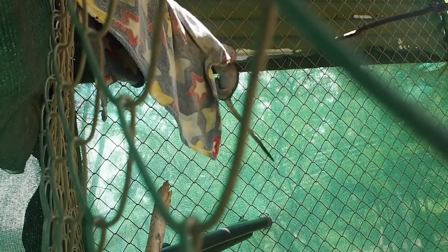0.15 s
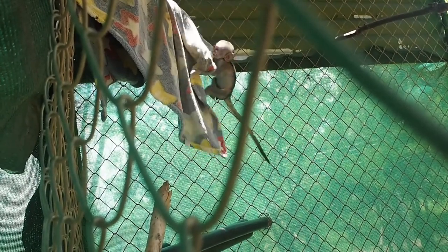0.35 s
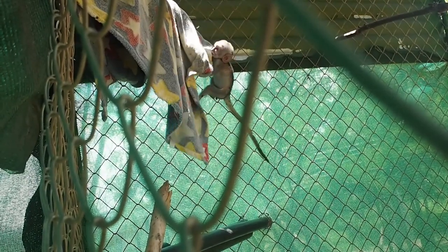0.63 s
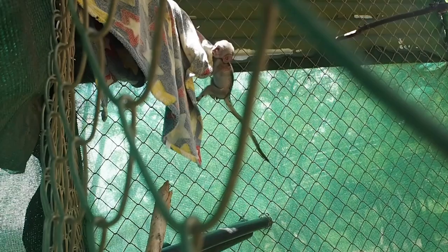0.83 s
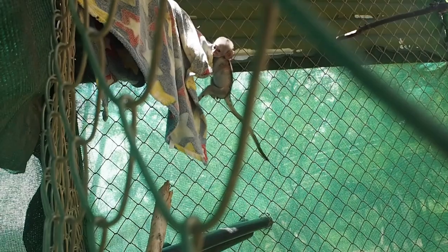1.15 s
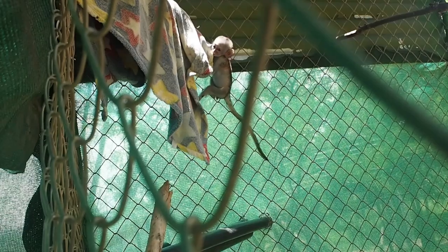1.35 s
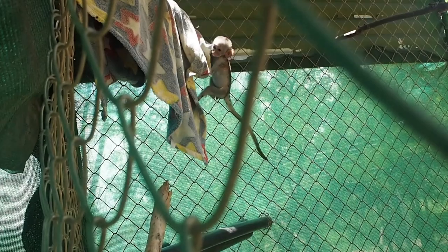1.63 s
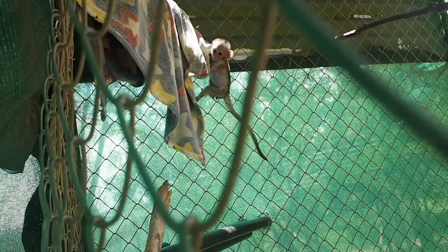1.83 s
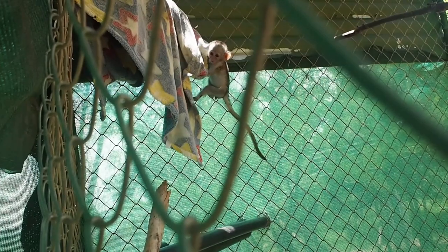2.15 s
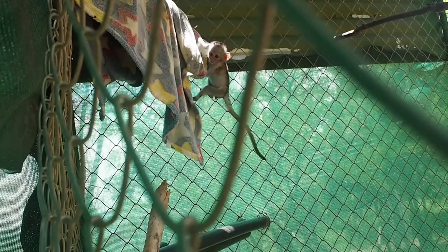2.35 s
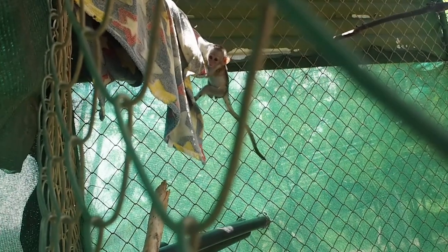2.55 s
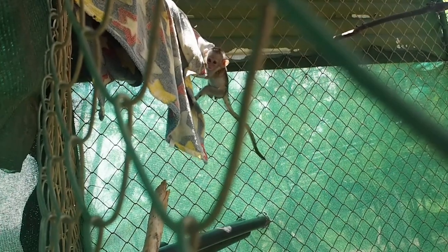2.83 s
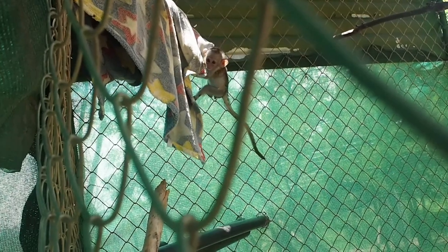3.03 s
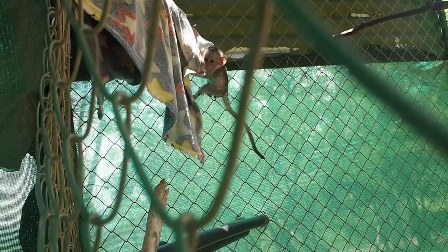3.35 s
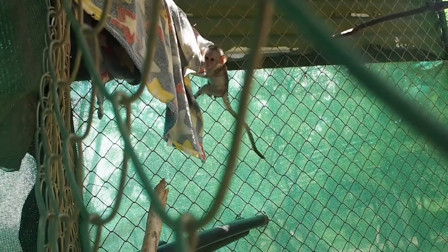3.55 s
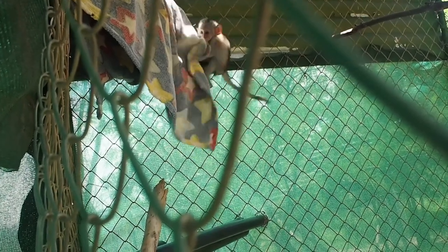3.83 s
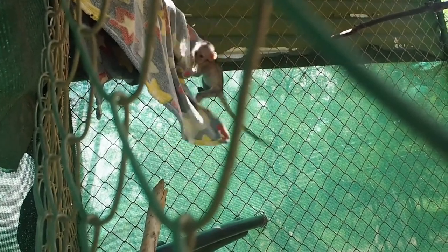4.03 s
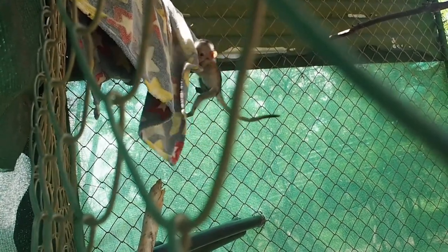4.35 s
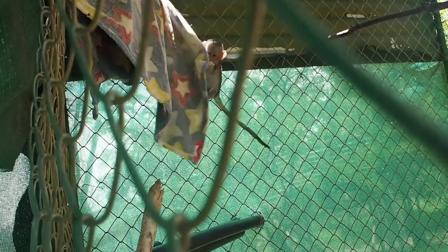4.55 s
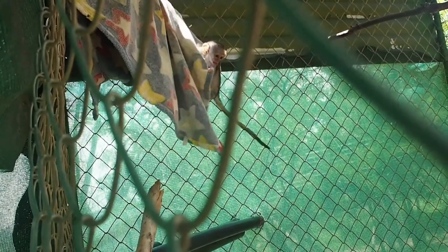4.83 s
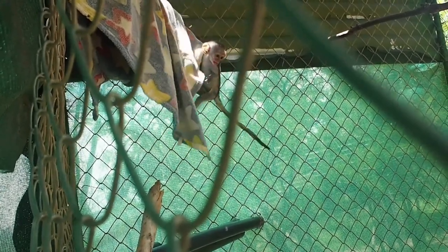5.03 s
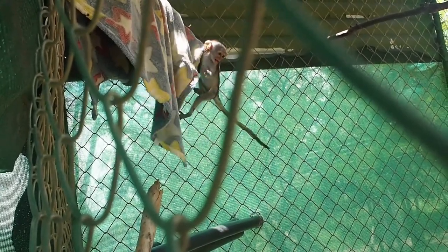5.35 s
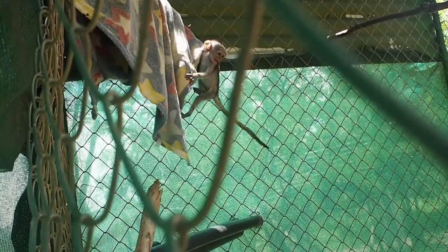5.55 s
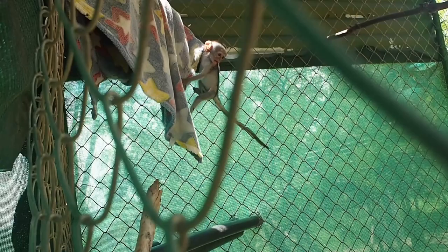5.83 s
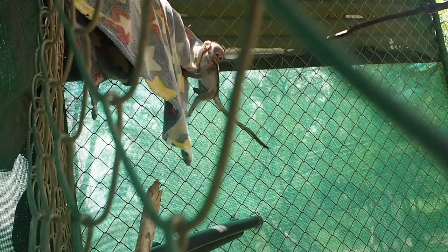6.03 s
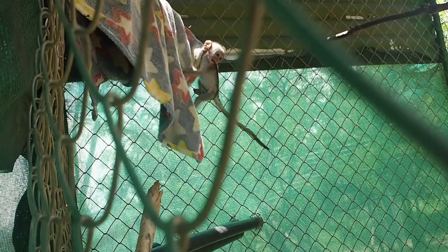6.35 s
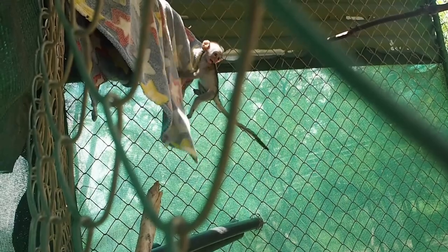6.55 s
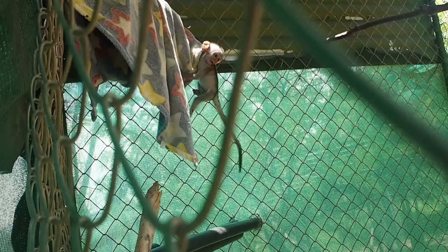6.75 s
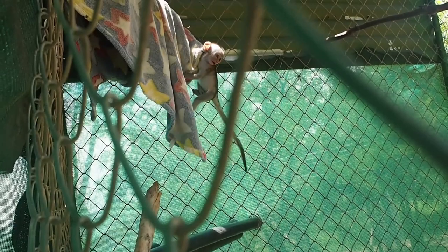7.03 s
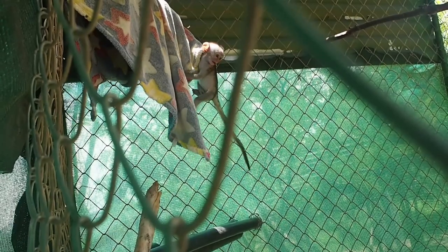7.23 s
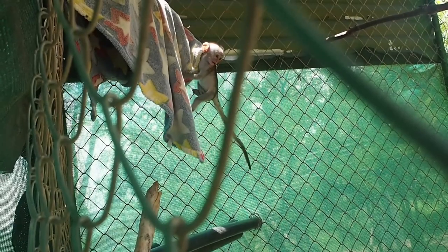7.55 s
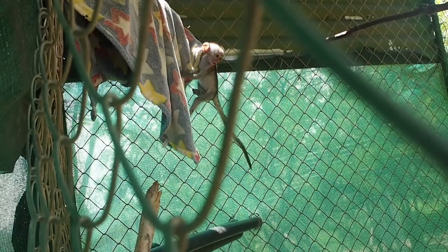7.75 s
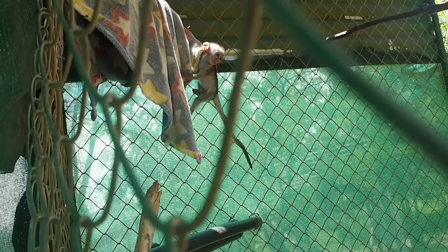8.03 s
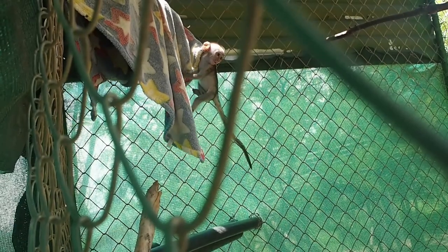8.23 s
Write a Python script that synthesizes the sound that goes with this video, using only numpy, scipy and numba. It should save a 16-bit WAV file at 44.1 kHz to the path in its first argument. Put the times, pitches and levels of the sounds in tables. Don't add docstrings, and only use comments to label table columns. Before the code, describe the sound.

In a mesh pen, a small monkey clicks, grunts, screams high and hoarse, then sinks into an even trill over insect buzz and knocks.

```python
import sys
import numpy as np
from scipy import signal
from scipy.fft import rfft, irfft
from scipy.io import wavfile
from scipy.ndimage import uniform_filter1d
from numba import njit

SR = 44100
rng = np.random.default_rng(int(sys.argv[2]) if len(sys.argv) > 2 else 0)


def store_wav(level_fs):
    pcm = np.round(np.clip(np.atleast_2d(level_fs), -1, 1) * 32767)
    wavfile.write(sys.argv[1], SR, pcm.T.astype(np.int16))


def invert_db(x):
    u = np.asarray(x, float) / 20
    return 10 ** u


N = 369989
HZ = np.fft.rfftfreq(N, 1 / SR)
TIME = np.arange(N) / SR


def read(table, hz):
    f, v = np.transpose(table)
    return np.interp(np.log(hz + 1), np.log(f), v)


def unit(x):
    return x / np.sqrt(np.mean(x ** 2))


def walk(rate):
    k = int(SR / rate)
    steps = np.repeat(rng.standard_normal(N // k + 1), k)
    return unit(uniform_filter1d(uniform_filter1d(steps, k), k)[:N])


def sides(x, db):
    return np.array([x * invert_db(db / 2), x * invert_db(-db / 2)])


def air():
    # f/Hz, level/dB per Hz
    air_spectrum = [(26, -40), (45, -21), (53, -13.5), (215, -2.5), (327, -6.5), (460, -0.5), (588, -3.5),
                    (913, -2.5), (1220, -9), (1720, -6.5), (4500, -10), (6300, -12), (8000, -8),
                    (11100, 2.5), (15600, -5)]
    # f/Hz, correlation
    likeness = [(60, 0.33), (400, 0.63), (3000, 0.4), (8000, 0.023), (15000, 0.15)]
    # f/Hz, level/dB
    air_balance = [(60, 10), (110, 0.5), (200, 0.5), (380, 2.5), (700, 2), (1290, -0.5), (2380, -0.5),
                   (4400, -0.5), (8120, 0.5), (15000, 4.5)]
    level_db, insect_hz, insect_share, insect_lag_s = -37, 327.9, .5, 4.0e-5
    phase = 2 * np.pi * np.cumsum(insect_hz * (1 + .0015 * walk(6))) / SR
    insects = 0
    for k in range(26, 49):
        insects = insects + np.sin(k * phase + k * k) * invert_db(3 * walk(2) + 2 * walk(25) - abs(k - 34) / 2.5)
    treble = 1 / (1 + (8500 / (HZ + 1)) ** 8)
    shared = rfft(rng.standard_normal(N)) + insect_share * treble * rfft(insects)
    like = np.clip(read(likeness, HZ), 0, 1)
    apart = np.sqrt(1 - like) * np.array([rfft(rng.standard_normal(N)) for _ in range(2)])
    lag = np.exp(-2j * np.pi * HZ * insect_lag_s * treble)
    both = np.sqrt(like) * np.array([shared * lag, shared]) + apart
    both = both * sides(invert_db(read(air_spectrum, HZ)), read(air_balance, HZ))
    out, swell, octave = 0, walk(0.057), np.log2((HZ + 1) / 30)
    for k in range(11):
        share = np.maximum(1 - np.abs(octave - k), 0)
        flutter = 1.64 * walk(14) * (.5 if k > 7 else 1)
        out = out + irfft(both * share, N) * invert_db(.5 * swell + 0.19 * walk(2.35) + flutter)
    return out * invert_db(level_db) / np.sqrt(np.mean(out.mean(axis=0) ** 2))


def long_cries():
    # t/s, pitch f/Hz, level/dB, mouth opening as 2nd-harmonic level/dB
    peep = [(0.0, 5900, -46, -12), (.017, 5750, -17.5, -17), (.03, 5690, -18, -16), (.075, 5840, -13, -22),
            (.09, 5460, -11.5, -15), (.112, 4570, -22, -0.5), (.13, 5120, -32, -5), (.15, 4640, -48, -12)]
    whine = [(4.078, 3640, -33, -7), (4.11, 3410, -30, 11.5), (4.132, 3260, -29, 9), (4.136, 4000, -32, 4),
             (4.155, 3800, -30.5, -2), (4.172, 3600, -33, 0), (4.179, 3900, -28.5, -7)]
    shriek = [(4.18, 4480, -29, -15), (4.197, 4700, -30.5, -22), (4.2, 3640, -29, 12),
              (4.215, 3660, -28.5, 4), (4.249, 3020, -29, 22)]
    pipe = [(4.25, 3862, -27, 10.2), (4.266, 3948, -33, 17)]
    yelp = [(4.268, 4530, -26.5, -1), (4.29, 4510, -30, 14), (4.3, 4870, -16, -3), (4.31, 5040, -46, -12),
            (4.342, 5040, -47, -20)]
    wake = [(4.735, 680, -45.5, 8), (4.752, 710, -29.5, 6.7), (4.765, 771, -42.5, 4),
            (4.785, 680, -36, 11.3), (4.8, 750, -27, 5.9), (4.822, 872, -31, 12)]
    climb = [(4.856, 1864, -21.5, -34), (4.895, 2200, -30, -15), (4.915, 2480, -27.5, -26),
             (4.945, 2760, -28.5, -8), (4.96, 2640, -26, -18), (5.0, 2430, -20, -22),
             (5.004, 2830, -29, -9), (5.073, 2993, -27.5, 0.5)]
    steps = [(5.077, 2510, -16.5, -11), (5.091, 2560, -31.5, 2), (5.094, 2960, -26, -2),
             (5.107, 2890, -23, -15), (5.11, 2430, -26.5, 2.5), (5.134, 2460, -22, -11)]
    scream = [(5.135, 3045, -30, -6), (5.184, 3330, -30.5, 3), (5.226, 3020, -26.5, -2),
              (5.27, 3376, -29, 4), (5.29, 3870, -26, 4), (5.336, 4130, -28.5, 5), (5.398, 4560, -21, -0.5),
              (5.458, 4653, -21, -2)]
    peak = [(5.459, 4850, -19, 7), (5.472, 4924, -19.5, 10.5), (5.552, 4910, -19, 14),
            (5.65, 5020, -19.5, 11.5), (5.668, 4820, -23, -33)]
    hiccup = [(5.81, 1450, -49, 4), (5.825, 1533, -22.5, 0.5), (5.84, 1740, -31, -26),
              (5.872, 1750, -46, 11)]
    wail = [(5.876, 3720, -32, -5), (5.885, 3900, -29.5, -2), (5.912, 3764, -23, -5),
            (5.928, 4350, -29, -8), (5.946, 4510, -26.5, -11), (5.964, 4470, -27.5, -7),
            (5.985, 4750, -24.5, -5), (6.025, 4750, -17, -6), (6.05, 4770, -21, -8)]
    keen = [(6.051, 4810, -15, -19), (6.062, 5180, -23.5, 3.5), (6.125, 5000, -15, 7.5),
            (6.153, 5230, -16.5, -0.5), (6.185, 4990, -17, 11), (6.31, 5190, -18, 10.5),
            (6.412, 5300, -18, 8.5), (6.602, 4915, -26, -0.5), (6.62, 4510, -39, 14)]
    gulp = [(7.104, 780, -39, 8), (7.122, 868, -25.5, 5.4), (7.135, 1150, -35, 4.3),
            (7.154, 1090, -34, 11.8)]
    yowl = [(7.155, 1730, -26, -16), (7.167, 2090, -18, -19), (7.175, 2342, -32, -8),
            (7.203, 2494, -36, -2), (7.213, 2630, -24, -19), (7.223, 2676, -27, -18),
            (7.243, 2320, -34, -7), (7.267, 2390, -36, -5), (7.29, 2377, -25, -16)]
    dying = [(7.291, 2386, -22.5, -23), (7.305, 2248, -28, -5), (7.313, 2123, -16, -12),
             (7.321, 2043, -22.5, -9), (7.333, 2100, -19, -14), (7.365, 2230, -27, -2),
             (7.389, 2037, -19, -14.5), (7.401, 1872, -25, -7), (7.428, 1245, -29.5, -3)]
    drop = [(7.478, 1680, -31, -10), (7.5, 1544, -17.5, -11), (7.522, 1068, -31, 1), (7.56, 975, -39, 9)]
    arch = [(7.571, 1230, -33, -1), (7.591, 1238, -34, 3), (7.601, 1243, -21, -11),
            (7.615, 1521, -27.5, -10), (7.625, 1592, -24.5, -15), (7.661, 1537, -35, 0),
            (7.671, 1440, -17.5, -20), (7.683, 1299, -23.5, -5.5), (7.715, 1160, -34.5, 2)]
    sink = [(7.716, 889, -34, 6.1), (7.722, 840, -28.5, 5.8), (7.742, 809, -26, 4), (7.75, 760, -23.5, 3.9),
            (7.762, 715, -34, 3.4)]
    return [(peep, .22), (whine, .58), (shriek, .9), (pipe, .15), (yelp, .42), (wake, .3), (climb, .4),
            (steps, .27), (scream, .38), (peak, .24), (hiccup, .3), (wail, .24), (keen, .16), (gulp, .4),
            (yowl, .24), (dying, .18), (drop, .2), (arch, .13), (sink, .2)]


def glide(s, length, db, first_hz, last_hz):
    attack_s, release_s, edge_db, opening_db = 0.0022, 0.01, -4, 1
    at = np.array([0, attack_s, length - release_s, length])
    level = db + edge_db * np.array([1, 0, 0, 1])
    hz = first_hz + (last_hz - first_hz) * at / length
    return np.transpose([s + at, hz, level, np.full(len(at), opening_db)])


def fold_harmonics(phase, hz, level, opening, rough):
    # f/Hz, level/dB
    mouth = [(700, -11), (1600, -3.5), (3000, 2), (5200, 3), (6800, -18), (9800, -7), (13600, -4),
             (15600, -4)]
    third_db, torn_db, upper_db = -15, 10, -10
    tone, lowest = 0, []
    for k in range(1, 7):
        db = level + read(mouth, k * hz)
        if k == 2:
            db = db + opening
        if k > 2:
            db = db + third_db + torn_db * rough - 2.1 * (k - 3)
        db = uniform_filter1d(db, size=200)
        lowest.append(db)
        torn = 1.25 * rough * k ** (.4 if k < 3 else .7) + .7 * (k * hz > 13500)
        torn = np.minimum(torn, 1)
        grain = [walk(520) + .4 * walk(1600) for _ in range(2)]
        smear = np.cos(k * phase) * grain[0] + np.sin(k * phase) * grain[1]
        shimmer = invert_db((1 + 4 * rough) * walk(170) + 4 * (k > 2) * walk(35))
        line = np.sqrt(2 - 2 * torn ** 2) * np.sin(k * phase) * shimmer
        fade = np.clip((15400 - k * hz) / 1600, .1, 1) * (k * hz < .36 * SR)
        tone = tone + invert_db(db) * (line + .9 * torn * smear) * fade
    for k in range(7, 15):
        db = uniform_filter1d(level + read(mouth, k * hz), size=200) + upper_db
        tone += invert_db(db) * np.sin(k * phase) * (k * hz < 12500) * grain[k % 2]
    loose = np.sin(1.235 * phase + .25 * grain[0]) * invert_db(4 * walk(50))
    tone += invert_db(lowest[0] - 27) * loose * (hz > 4500) * (hz < 5400)
    return tone, lowest[0], lowest[1]


def stray_strand(phase, first_db, rough):
    hop = np.repeat(rng.uniform(-1, 1, N // 260 + 1), 260)[:N]
    stray = np.cumsum(np.gradient(phase) * (1 + .3 + .4 * hop))
    return sum(invert_db(first_db + 4 + 5 * walk(200)) * rough ** 4 * np.sin(k * stray) for k in (1, 2, 3))


def sag_haze(aim, second_db, sag):
    haze_db, lead_s = 17.5, .009
    haze = sum(walk(1400) * turn(1.96 * aim) for turn in (np.sin, np.cos))
    return invert_db(second_db + haze_db + 1.6 * walk(150)) * np.roll(sag, -int(lead_s * SR)) * haze


def resonant_noise(hz, width):
    gain = 1 / (1 + ((HZ - hz) / (width / 2)) ** 2) ** 2
    return unit(irfft(rfft(rng.standard_normal(N)) * gain, N))


def throat_rasp(first_db, second_db, rough):
    # f/Hz, width f/Hz, level/dB
    rasp_bands = [(2520, 1830, -6), (3900, 2300, -7), (5050, 3400, 1.5), (10800, 2800, -0.5),
                  (12300, 15600, -7)]
    effort = np.sqrt(invert_db(first_db) ** 2 + invert_db(second_db) ** 2) * rough ** 3
    return effort * sum(invert_db(d + 4.5 * walk(220)) * resonant_noise(f, w) for f, w, d in rasp_bands)


def breath_leak(first_db):
    hz, width_hz = 5250, 1500
    low = invert_db(first_db - 19.5 + 3.2 * walk(120)) * resonant_noise(hz, width_hz)
    return low + invert_db(first_db - 23.5 + 3.0 * walk(90)) * resonant_noise(2 * hz, 2 * width_hz)


def squeals():
    # t/s, length t/s, level/dB, first f/Hz, last f/Hz
    short_notes = [
        (0.174, 0.012, -28.5, 4920, 4440),
        (0.184, 0.033, -28.5, 4356, 4320),
        (3.889, 0.046, -36, 3400, 4318),
        (4.005, 0.054, -30, 4178, 3290),
        (4.827, 0.03, -35.5, 1304, 1497),
    ]
    # t/s, change level/dB, half length t/s
    catches = [(0.034, -33, 0.0048), (0.058, -24, 0.0055), (0.088, -10, 0.0059), (0.104, -8, 0.0057),
               (3.904, 6, 0.0046), (3.923, 6.5, 0.0068), (4.021, 2, 0.0098), (4.041, -8, 0.0077),
               (4.298, -4.5, 0.0055), (4.767, -9, 0.013), (6.119, -0.5, .015), (6.208, -6, 0.025),
               (6.247, 5, 0.013), (6.31, -5.5, 0.011), (6.39, 5, 0.01), (6.427, -7.5, .006),
               (5.476, 4.5, 0.0047), (5.975, -2, .006), (5.631, 1.5, 0.019), (5.224, -3, .005),
               (5.275, 2, 0.009), (5.559, -1, 0.022), (5.61, -8, 0.03), (4.244, -9, 0.0048),
               (5.969, -12, 0.0045), (7.194, 2, 0.016), (5.496, 1, 0.0037), (5.514, -7.5, 0.0045),
               (6.271, 2.5, 0.0041)]
    # t/s, share of pitch lost, half length t/s
    sags = [(5.286, 0.05, 0.033), (5.367, 0.13, 0.04), (5.429, 0.13, 0.051), (5.504, 0.13, 0.045),
            (5.601, 0.17, 0.051), (6.211, .02, 0.03), (6.267, 0.097, 0.046), (6.37, 0.11, 0.049),
            (6.488, 0.056, 0.072), (6.554, 0.066, 0.042)]
    note_rough, rough_per_sag, rough_per_db = .5, 2.4, .017
    sag_db, sag_open_db = -21, 19
    cries = long_cries() + [(glide(*note), note_rough) for note in short_notes]
    cries = sorted(cries, key=lambda cry: cry[0][0][0])
    rows = [np.vstack([np.transpose(c), np.full(len(c), r)]) for c, r in cries]
    s, hz, level, opening, rough = np.hstack(rows)
    on = sum(1. * (TIME >= c[0][0]) * (TIME < c[-1][0]) for c, _ in cries)
    on = uniform_filter1d(np.minimum(on, 1), size=110)
    for at, depth_db, half in catches:
        on = on * invert_db(depth_db * np.maximum(1 - ((TIME - at) / half) ** 2, 0))
    sag = 0
    for at, share, half in sags:
        sag = sag + share * np.cos(np.pi / 2 * np.clip((TIME - at) / half, -1, 1)) ** 2
    slackness = np.hstack([np.minimum(np.max(row[2]) - row[2], 9) for row in rows])
    rough = uniform_filter1d(np.interp(TIME, s, rough + rough_per_db * slackness), size=400)
    rough = np.minimum(rough + rough_per_sag * sag, 1)
    aimed_hz = np.interp(TIME, s, hz)
    aim = 2 * np.pi * np.cumsum(aimed_hz) / SR
    hz = aimed_hz * (1 - sag)
    jitter = 1 + .02 * walk(300) * rough + .07 * walk(110) * rough ** 4 + .006 * walk(70)
    phase = 2 * np.pi * np.cumsum(uniform_filter1d(hz, size=150) * jitter) / SR
    level = np.interp(TIME, s, level) + sag_db * sag
    opening = np.interp(TIME, s, opening) + sag_open_db * sag
    tone, first_db, second_db = fold_harmonics(phase, hz, level, opening, rough)
    tone = tone + stray_strand(phase, first_db, rough) + sag_haze(aim, second_db, sag)
    return on * (tone + throat_rasp(first_db, second_db, rough) + breath_leak(first_db))


def gasps():
    # t/s, length t/s, level/dB, centre f/Hz
    breaths = [
        (.0, 0.2, -44, 2330),
        (0.134, 0.066, -39, 2150),
        (4.346, 0.96, -45.5, 2347),
        (6.583, 0.16, -38, 2650),
        (6.588, 0.17, -40.5, 7340),
    ]
    out = np.zeros(N)
    for s, length, db, hz in breaths:
        swell = np.clip(np.minimum((TIME - s) / 0.017, (s + length - TIME) / length), 0, 1)
        out += invert_db(db) * swell * resonant_noise(hz, 2900)
    return out


def ring(hz, t60):
    t = TIME[:2600]
    return np.sin(2 * np.pi * hz * t) * 1000. ** (-t / t60)


def ticks():
    # t/s, peak level/dB, f/Hz
    lip_ticks = [(0.7857, -33, 2010), (1.0296, -36, 1850), (1.557, -34, 2520), (1.635, -39, 1540),
                 (1.816, -21.5, 2560), (1.885, -32, 1580), (2.73, -38, 3260), (3.1712, -34, 1780),
                 (3.339, -37, 1580), (4.0792, -20.5, 3420), (4.356, -29.5, 3830), (6.8022, -23.5, 1600)]
    out = np.zeros(N)
    for s, db, hz in lip_ticks:
        chance = rng.standard_normal(2600)
        spit = uniform_filter1d(chance, size=5) - uniform_filter1d(chance, size=50)
        spit = spit * 1000. ** (-TIME[:2600] / 0.027)
        out[int(s * SR):int(s * SR) + 2600] += invert_db(db) * (ring(hz, 0.023) + .8 * spit)
    return out


def slack(pitch, tilt_db, throat, breath):
    phase = 2 * np.pi * np.cumsum(pitch) / SR
    drift = np.cumsum(rng.standard_normal((28, len(pitch))), axis=1)
    drift = drift / np.sqrt(np.arange(1, 29))[:, None] * .011
    stack = 0
    for k in range(1, 28):
        level = invert_db(read(throat, k * pitch) + tilt_db * np.log2(k))
        stack = stack + level * np.sin(k * (phase + drift[k]) + 0.28 * k * k)
    return unit(stack) + breath * (1 + np.sin(phase))


def grunts():
    # t/s, peak level/dB, pitch f/Hz, length t/s, brightness level/dB per octave
    puffs = [(0.842, -29, 548, 0.0084, -5.5), (0.905, -32.5, 430, 0.015, -22),
             (1.232, -33, 440, 0.018, -16), (1.305, -23.5, 356, 0.02, -3), (1.317, -33.5, 390, 0.021, -22),
             (1.375, -30, 493, 0.0075, 0), (1.911, -27.5, 346.5, 0.058, -4),
             (1.995, -30.5, 432, 0.015, -1.5), (2.073, -28.5, 386, 0.023, -16.5),
             (2.552, -39, 440, 0.044, 9.5), (2.626, -42, 399, 0.037, 3), (3.466, -33, 460, 0.031, 3),
             (3.514, -35.5, 438, 0.048, 1.5), (3.584, -35, 504, 0.027, -8),
             (3.763, -14, 492.5, 0.024, -2.5), (3.778, -20, 548, 0.015, -1), (3.795, -28.5, 538, 0.022, -3),
             (6.964, -27.5, 390, 0.036, -16), (7.043, -18.5, 447, 0.064, -2.5),
             (7.86, -25.5, 477.7, 0.031, -2), (7.926, -22.5, 443, 0.022, -1.5),
             (7.982, -20.5, 386, 0.03, -2), (8.031, -22, 398, 0.044, -1.5), (8.07, -37, 404, 0.023, -5)]
    # f/Hz, level/dB
    chatter_throat = [(250, -67), (420, -16), (830, -6.5), (1250, -3.5), (1600, 9.5), (2050, -3),
                      (2500, -15), (3120, 4), (3650, -14.5), (4300, -2.5), (5200, -25), (7500, -65),
                      (9750, -6), (12000, -25)]
    # f/Hz, level/dB
    round_throat = [(250, -95), (420, -10), (830, 1), (1100, 1.5), (1400, 13.5), (1750, 2), (2300, -13),
                    (3050, 1), (3650, -6), (4400, 3), (5200, -14), (7500, -60), (9750, -15), (12000, -36)]
    # t/s, pitch f/Hz, level/dB
    creak = [
        (7.753, 403, -37),
        (7.76, 407, -28),
        (7.767, 506, -22),
        (7.784, 480, -26),
        (7.809, 426, -26),
        (7.831, 401, -31.5),
        (7.846, 373, -40),
    ]
    chatter_s, chatter_fall, chatter_air_db = 7.8, 0.0535, -43
    trill_s, trill_every_s, trill_length_s = 8.092, .0622, 0.061
    trill_db, trill_scatter_db, trill_tilt_db = -19.5, 1.0, -3
    trill_hz, trill_rise_hz = 417.3, 1.56
    out, wobble = np.zeros(N), walk(150)
    breath = unit(irfft(rfft(rng.standard_normal(N)) * invert_db(read(chatter_throat, HZ)), N))
    trill = []
    for k in range(5):
        db = trill_db + trill_scatter_db * rng.standard_normal()
        hz = trill_hz + k * trill_rise_hz
        trill.append((trill_s + k * trill_every_s, db, hz, trill_length_s, trill_tilt_db))
    for s, db, hz, length, tilt_db in puffs + trill:
        i = int(s * SR) + np.arange(min(int(length * SR), N - int(s * SR)))
        in_trill, in_chatter = s > trill_s - length, s > chatter_s
        bend = .55 if in_trill else 1.04 if in_chatter else .5
        swell = np.sin(np.pi * ((i - i[0]) / (length * SR)) ** bend) ** (1.6 if in_trill else 1)
        fall = chatter_fall * in_chatter * (np.exp(-(i - i[0]) / (.012 * SR)) - .25)
        pitch = hz * (1 + fall + 0.02 * wobble[i])
        throat = chatter_throat if in_chatter else round_throat
        puff = slack(pitch, tilt_db, throat, (.12 if in_trill else .24) * breath[i])
        out[i] += invert_db(db - 6.0) * swell * puff
    out += invert_db(chatter_air_db + 2.0 * walk(79)) * breath * (TIME > chatter_s)
    s, hz, db = np.transpose(creak)
    i = np.arange(int(s[0] * SR), int(s[-1] * SR))
    pitch = np.interp(TIME[i], s, hz) * (1 + .011 * wobble[i])
    out[i] += invert_db(np.interp(TIME[i], s, db)) * slack(pitch, 0.44, chatter_throat, .15 * breath[i])
    return out


def knocks():
    # t/s, peak level/dB, gain of the crack's noise/dB, left minus right level/dB
    hits = [(3.09, -23, 13, -8), (3.204, -36, -20, -11), (3.778, -10.5, 18, -10), (4.816, -12, 20.5, -13),
            (4.892, -23.5, -18, 0.0), (5.084, -7, -28, -10), (5.364, -19.5, -22.5, 2),
            (5.872, -10, 19, -11.5), (6.458, -8, 21, -10.5), (6.717, -4, -17, -7), (6.875, -22, -16, -8),
            (8.027, -11.5, 21, -11.5)]
    # f/Hz, level/dB, 60 dB decay t/s
    hollow = [(998, -2, 0.026), (1676, 4.5, 0.012)]
    out = np.zeros((2, N + 2600))
    for s, db, crack_db, pan_db in hits:
        chance = rng.standard_normal(2603)
        low, high = (invert_db(d) * ring(f * (1 + .015 * c), t60) for (f, d, t60), c in zip(hollow, chance))
        body = (low - high) * np.minimum(TIME[:2600] / .0004, 1)
        crack = np.diff(uniform_filter1d(uniform_filter1d(chance[2:], size=4), size=5))
        crack = crack * 1000. ** (-TIME[:2600] / 0.006)
        blow = invert_db(db - 2.0) * (body + invert_db(crack_db) * crack)
        out[:, int(s * SR):int(s * SR) + 2600] += sides(blow, pan_db)
    band_hz = (600, 8500)
    return signal.sosfilt(signal.butter(2, band_hz, "band", fs=SR, output="sos"), out[:, :N])


@njit
def walls(x, lags, gain, damp):
    line, soft, out = np.zeros((8, 4096)), np.zeros(8), np.zeros((2, len(x)))
    for i in range(len(x)):
        total = 0.
        for k in range(8):
            soft[k] += (1 - damp) * (gain[k] * line[k, (i - lags[k]) & 4095] - soft[k])
            total += soft[k]
            out[k % 2, i] += soft[k]
        for k in range(8):
            line[k, i & 4095] = x[i] + soft[k] - total / 4
    return out


def scene():
    # f/Hz, level/dB
    voice_balance = [(1000, 1.5), (2500, 1), (5000, 2.5), (10000, 1)]
    pen_t60_s, pen_damp, pen_db = .13, 0.089, -9.5
    background = air()
    monkey = squeals() + gasps() + ticks() + grunts()
    near = irfft(rfft(monkey) * sides(np.ones(len(HZ)), read(voice_balance, HZ)), N)
    blows = knocks()
    lags = rng.integers(250, 1500, 8)
    echo = walls(monkey + 0.023 * blows[1], lags, invert_db(-60 * lags / SR / pen_t60_s), pen_damp)
    return near + blows + invert_db(pen_db) * echo + background


@njit
def follower(x, attack, release):
    y, e = np.empty(len(x)), 0.
    for i in range(len(x)):
        e += (x[i] - e) * (attack if x[i] > e else release)
        y[i] = e
    return y


def roll_off(x):
    return signal.sosfilt(signal.butter(12, 16040, fs=SR, output="sos"), x)


def record(dry):
    top_hz, offset = 15750, -.0025
    loud = follower(np.abs(dry).max(axis=0), 0.00048, 1.5e-5)
    x = dry * np.minimum(1, (0.3 / (loud + 1e-9)) ** 0.7)
    x = x / (1 + np.abs(x) ** 4) ** .25
    cut = irfft(rfft(x) * (HZ < top_hz), N)
    return roll_off(np.clip(cut + offset, -1, 1))


dry = scene()
out = record(dry)
store_wav(out)
```